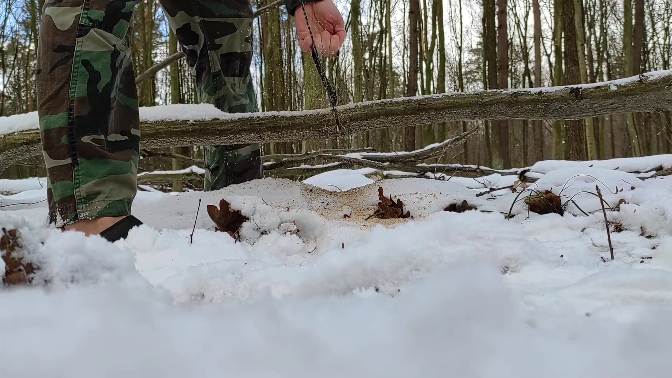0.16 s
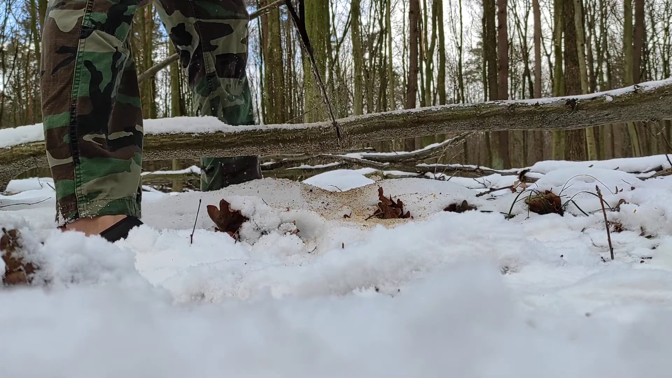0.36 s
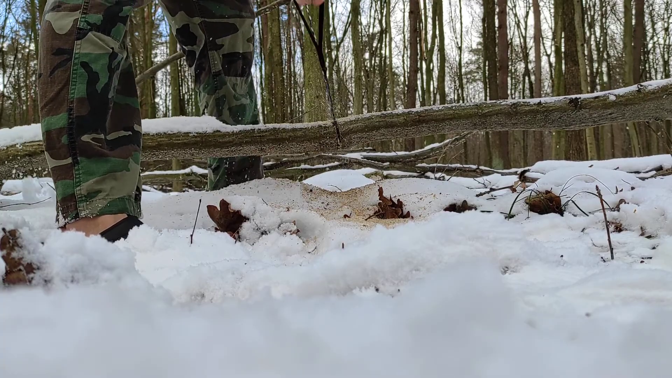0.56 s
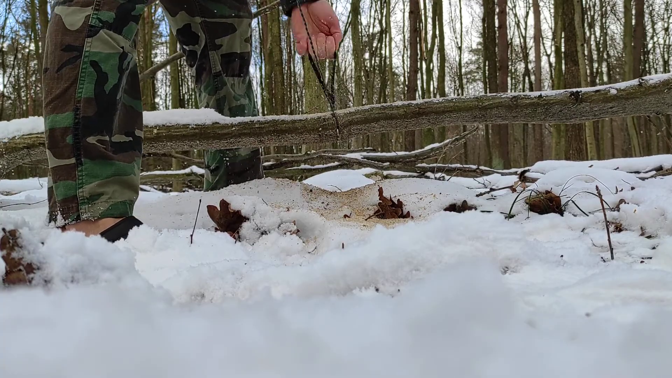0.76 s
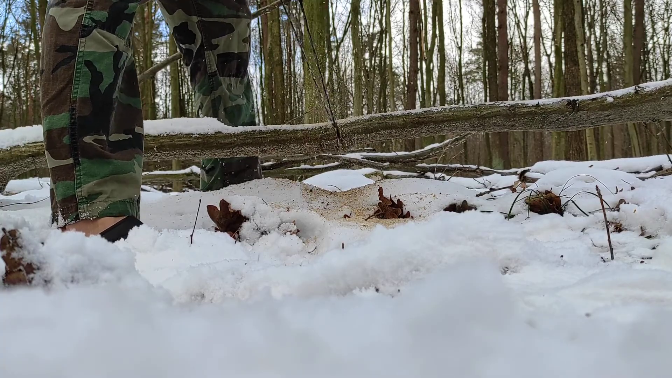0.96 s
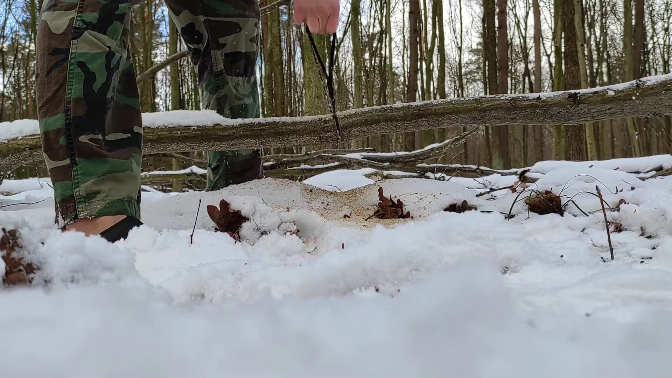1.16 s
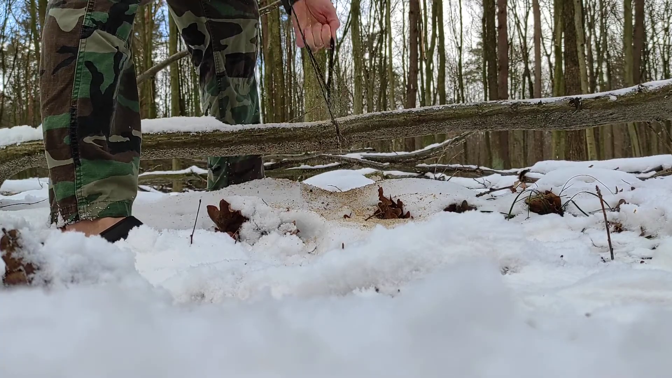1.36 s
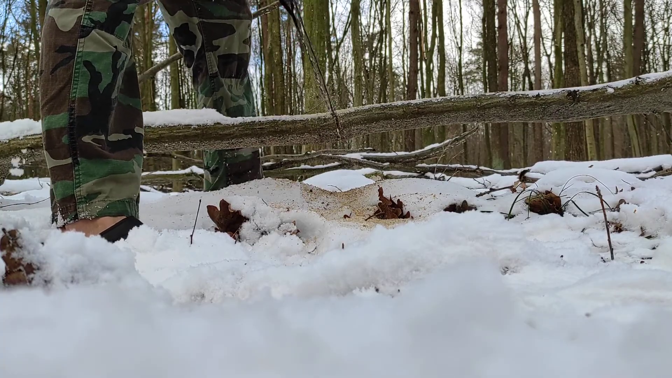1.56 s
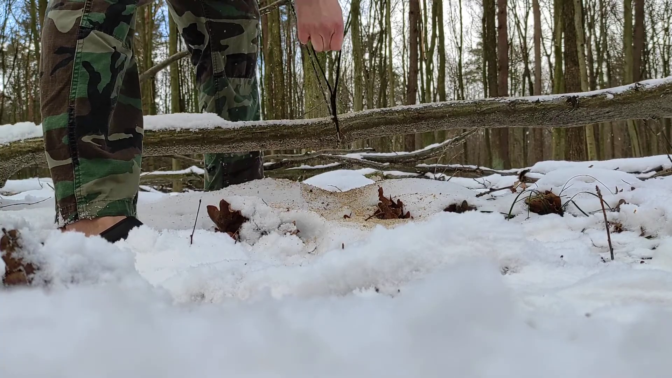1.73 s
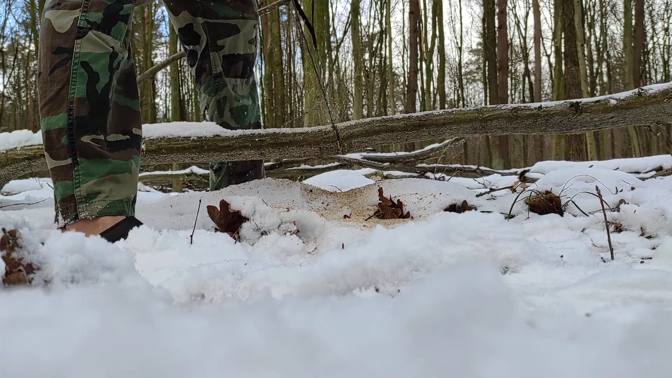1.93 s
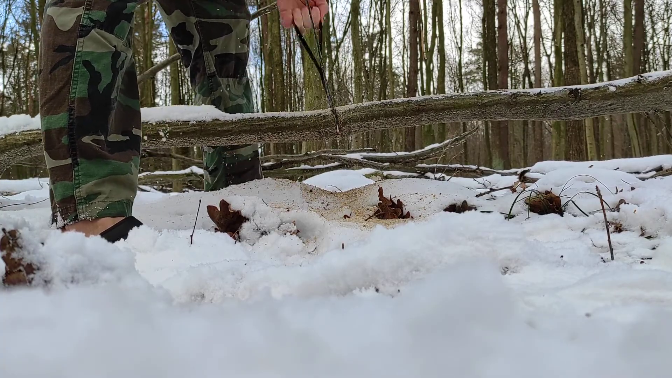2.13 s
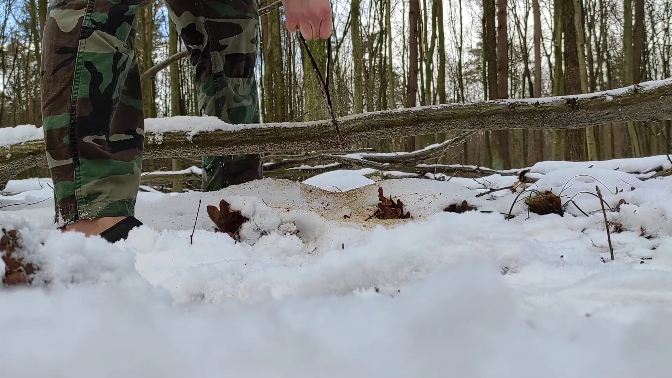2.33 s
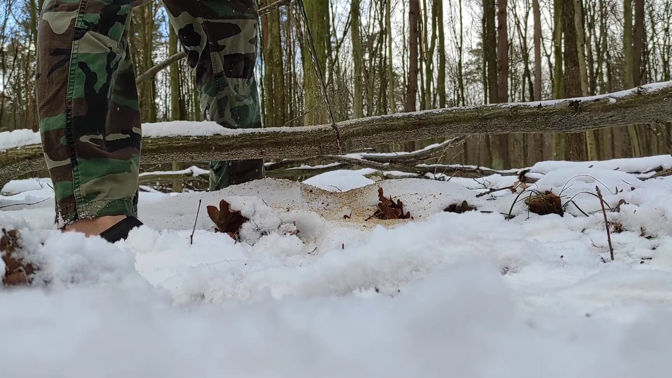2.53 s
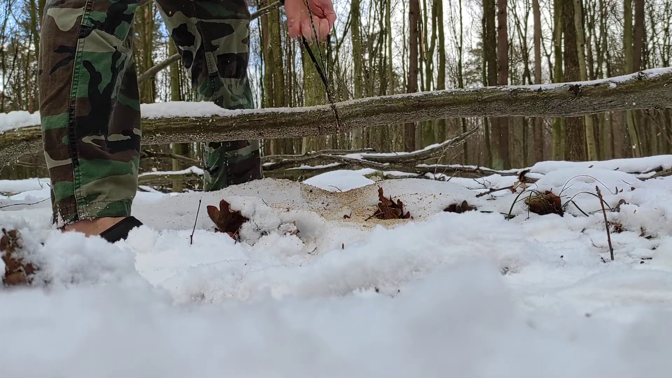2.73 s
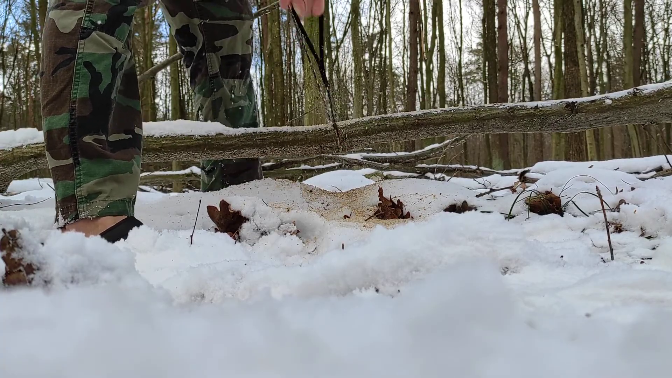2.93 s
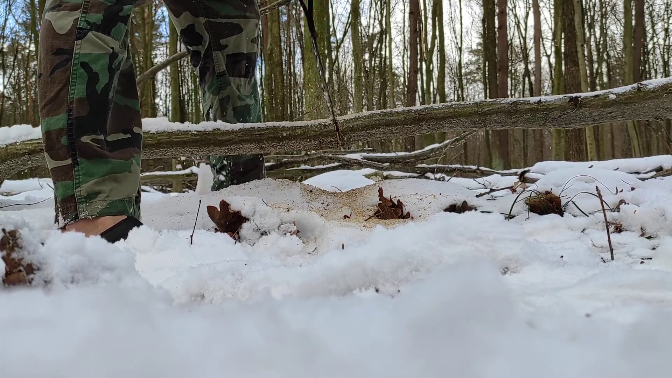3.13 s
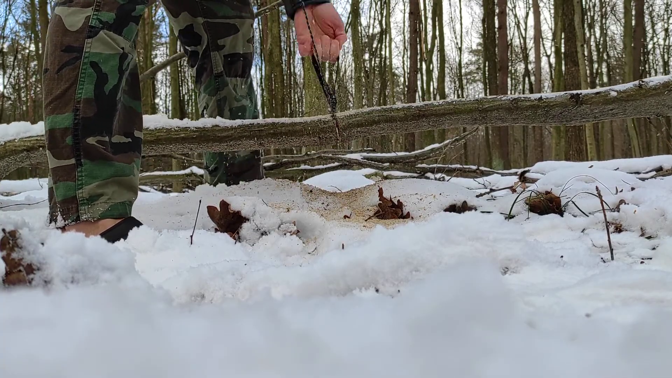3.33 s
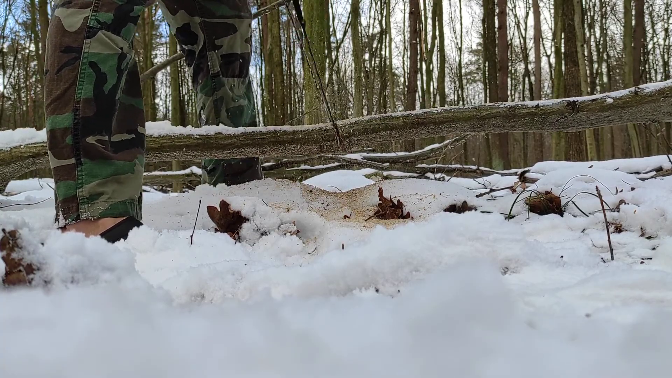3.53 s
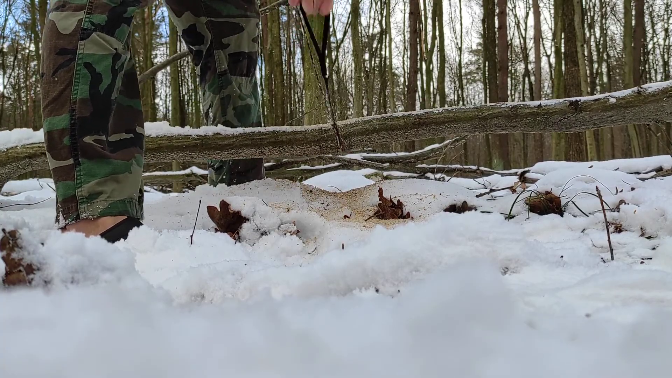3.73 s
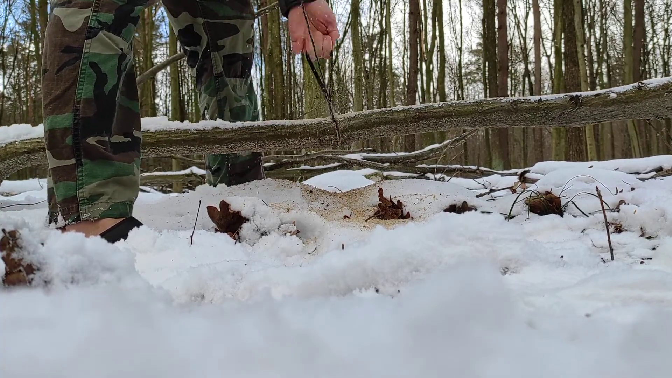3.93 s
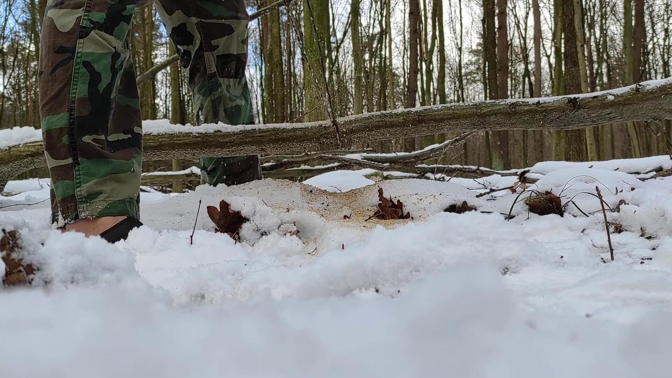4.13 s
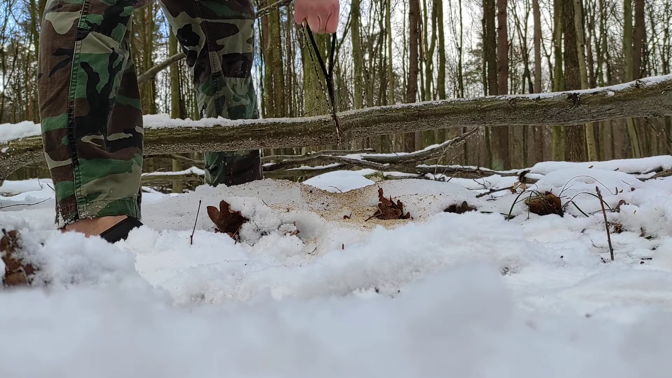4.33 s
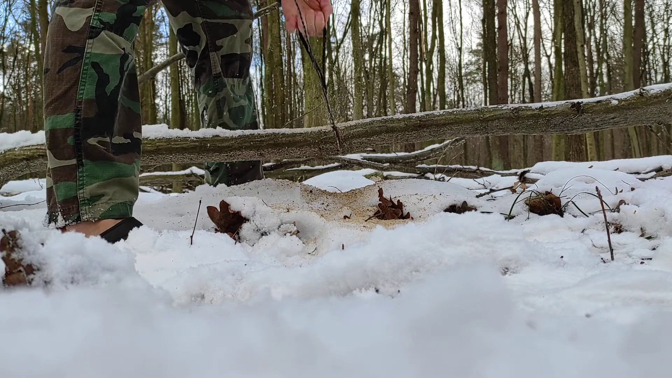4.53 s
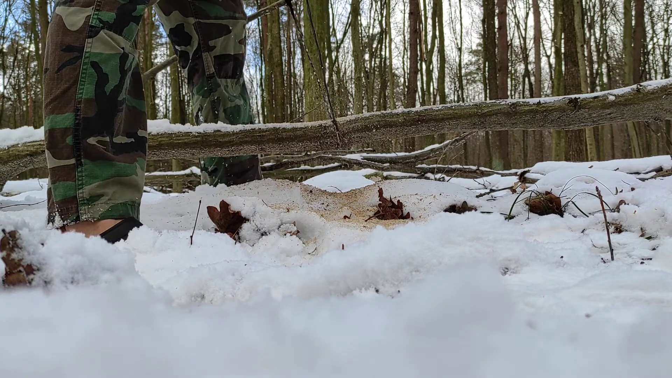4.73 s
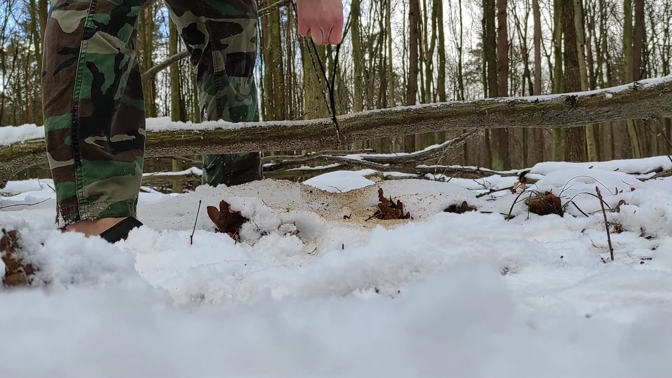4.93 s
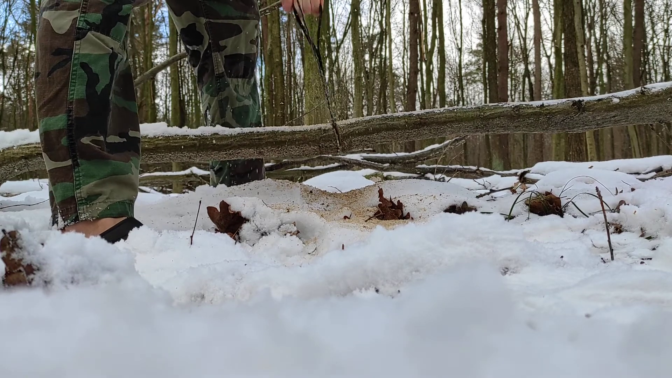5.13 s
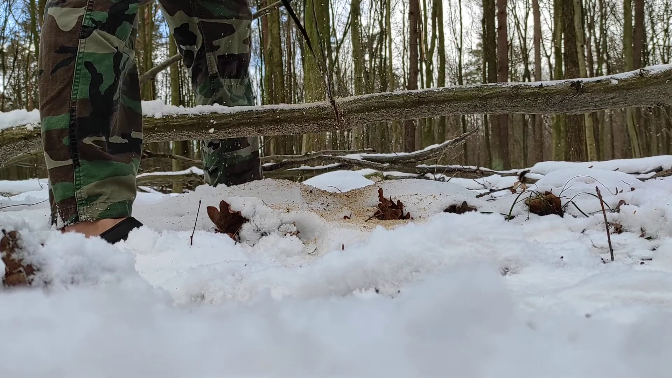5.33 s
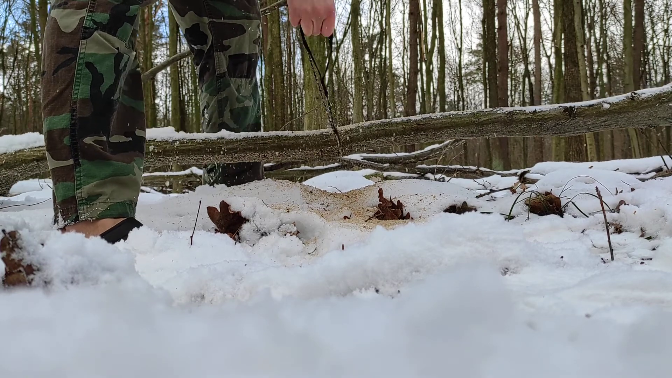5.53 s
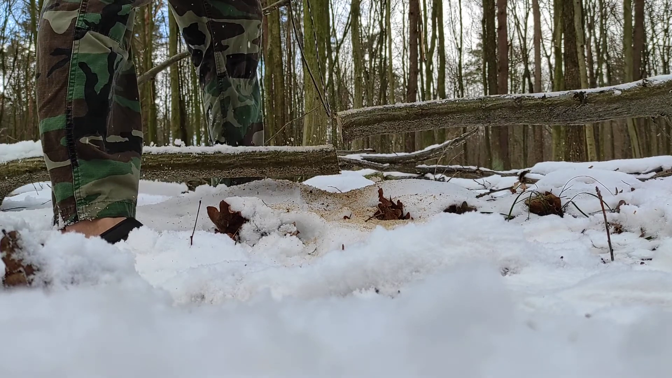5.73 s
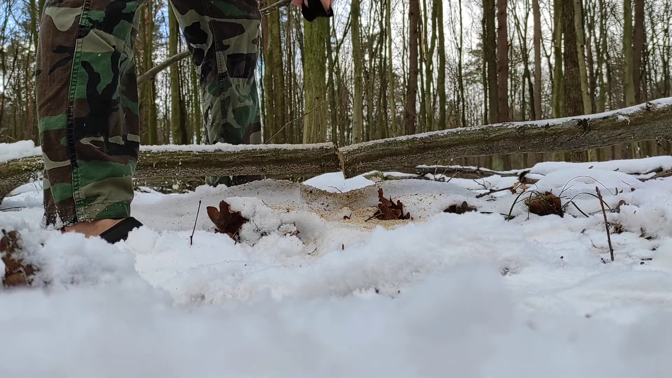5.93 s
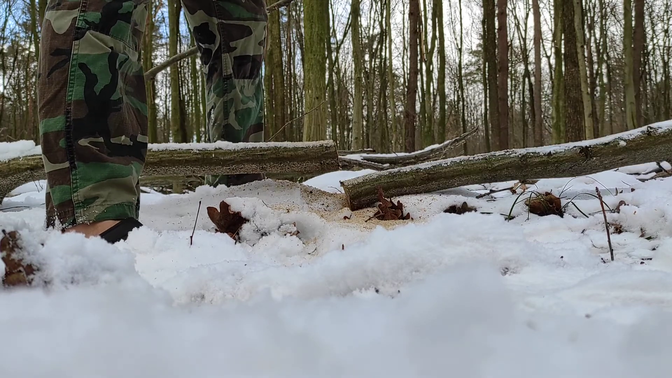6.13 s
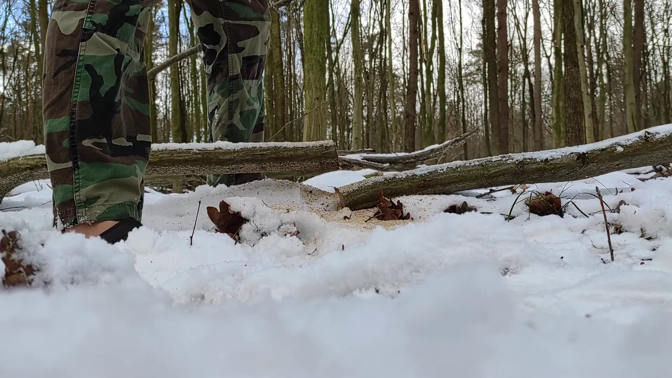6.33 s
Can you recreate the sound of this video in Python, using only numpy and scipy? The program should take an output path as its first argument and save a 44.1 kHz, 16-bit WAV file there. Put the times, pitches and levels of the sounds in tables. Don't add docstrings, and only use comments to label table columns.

```python
import sys
import numpy as np
from scipy import signal
from scipy.fft import rfft, irfft, next_fast_len
from scipy.io import wavfile
from scipy.ndimage import uniform_filter1d, map_coordinates

SR = 44100
rng = np.random.default_rng(int(sys.argv[2]) if len(sys.argv) > 2 else 0)


def output_pcm(signal):
    pcm = np.clip(np.atleast_2d(signal).T, -1, 1) * 32767
    wavfile.write(sys.argv[1], SR, np.round(pcm).astype(np.int16))


def ratio_of_db(decibels):
    return 10 ** (np.asarray(decibels, float) / 20)


N = 285325

THROUGH_S, LAND_S = 5.628, 6.15
RING_LAG_S, SWAY_LAG_S = 0.012, 0.064
BITE_SCATTER_DB, GRIP_DB, UNEVEN_DB = 1.9, 0.8, 1.2
CHATTER_DB = 3.0
# time_s, share_0_1
CUT_DEPTH = [(0, 0.02), (3.4, 0.25), (4.4, 0.52), (6.47, 0.66)]
# pitch_hz, width_hz, level_db
SOUND_LOG_MODES = [(184, 55, -17.5), (296, 21, 3.5), (471, 31.3, -3.5), (600, 76, -6.5), (866, 26, -8.5),
                   (1095, 37, -12), (1350, 91, -19.5)]
# pitch_hz, width_hz, level_db
CUT_LOG_MODES = [(204, 156, -15.5), (310, 78, 2), (421, 94, 6), (526.6, 71, 0.5), (900, 113, -4),
                 (1080, 88, -2.5)]
# pitch_hz, width_hz, level_db
CHATTER_MODE = [(296, 40, 0)]
# freq_hz, level_db
SWAY_HUM = [(70, -40.5), (110, -16), (140, -0.5), (220, 0.5), (400, -8), (700, -17), (1500, -37)]


def saw():
    t = np.arange(N) / SR
    depth_s, depth_share = np.transpose(CUT_DEPTH)
    cut = np.clip(np.interp(t, depth_s, depth_share), 0, 1)

    def until_through(db, lag_s):
        return ratio_of_db(db - 520 * np.clip(t - THROUGH_S - lag_s, 0, 1))

    rasp_db = pulls(PULL_RASP, turn_db=27, lag_s=0) - 2.0 + UNEVEN_DB * wobble(25)
    rasp_gain = until_through(rasp_db, 0) + jolts(JOLT_RUSTLE, below_db=-3.5)
    scrape_db = pulls(PULL_RASP, turn_db=25, lag_s=-0.0028) - 4.0 - 7 * cut
    scrape_gain = until_through(scrape_db, 0) + jolts(JOLT_RUSTLE, below_db=1.5)
    ring_db = pulls(PULL_RING, turn_db=20, lag_s=RING_LAG_S, peaked=0.79) + 1.5
    ring_gain = until_through(ring_db, RING_LAG_S) + jolts(JOLT_RING, below_db=-1)
    sway_db = pulls(PULL_RING, turn_db=9, lag_s=SWAY_LAG_S) - 14 + 17 * cut
    sway_db = np.where(t < THROUGH_S + SWAY_LAG_S, sway_db, -47)
    sway_db = sway_db - 110 * np.clip(t - LAND_S, 0, 1)

    grip = ratio_of_db(GRIP_DB * wobble(40) + 0.81 * wobble(160))
    teeth = bites(per_s=650, scatter_db=BITE_SCATTER_DB, bed=0.7) * grip
    blurred = teeth + 0.76 * rng.standard_normal((2, N))
    tearing = patchy(spread(blurred), depth_db=3.0)
    chatter_db = CHATTER_DB * even(filtered(tearing[:1], modes(CHATTER_MODE)), span_s=0.03)

    rasp = even(filtered(snow_echo(spread(teeth)), ports), span_s=0.047)
    rasp = rasp * rasp_gain * ratio_of_db(chatter_db)
    scrape = even(filtered(tearing, bark), span_s=0.05) * scrape_gain
    sound_ring = unit(filtered(tearing, modes(SOUND_LOG_MODES)))
    cut_ring = unit(filtered(tearing, modes(CUT_LOG_MODES)))
    wood = np.sqrt(1 - cut) * sound_ring + np.sqrt(cut) * cut_ring
    wood = filtered(wood, lambda hz: hz ** 2 / (hz + 60 - 60j) ** 2)
    sway = even(spread(noise(SWAY_HUM)), span_s=0.45) * ratio_of_db(sway_db)
    return rasp + scrape + sway + even(wood, span_s=0.034) * ring_gain


RISE, FALL = 2.6, 3.0
PULL_RASP, PULL_RING = 3, 4
# start_s, length_s, fastest_share_0_1, rasp_db, log_ring_db
STROKES = [(-.061, 0.3, 0.49, -28, -33), (0.274, 0.28, 0.45, -28.5, -32), (0.564, 0.3, 0.51, -29, -33.5),
           (0.892, 0.28, 0.5, -27.5, -31.5), (1.209, 0.29, 0.5, -29, -32.5),
           (1.534, 0.27, 0.53, -27, -30.5), (1.839, 0.28, 0.55, -29, -32), (2.173, 0.28, 0.43, -27.5, -31),
           (2.471, 0.29, 0.47, -28.5, -33), (2.801, 0.27, 0.55, -29, -33), (3.098, 0.29, 0.64, -29.5, -34),
           (3.441, 0.28, 0.44, -31.5, -34), (3.748, 0.28, .55, -27, -37.5), (4.047, 0.31, 0.58, -31, -36.5),
           (4.349, 0.32, .56, -30.5, -37), (4.671, 0.31, .6, -30.5, -35), (4.978, 0.32, .62, -29, -36.5),
           (5.308, .32, 0.55, -32, -38.5)]


def pulls(column, turn_db, lag_s, peaked=1):
    rows = np.transpose(STROKES)
    middle_s = rows[0] + rows[1] / 2
    strength_db = np.interp(np.arange(N) / SR - lag_s, middle_s, rows[column])
    return strength_db - turn_db * slack(lag_s) ** peaked


def slack(lag_s):
    t = np.arange(N) / SR - lag_s
    start, length, share = np.transpose(STROKES)[:3]
    fastest = start + np.clip(share, 0.1, 0.9) * length
    knots = np.ravel([start, fastest, start + length], "F")
    u = np.interp(t, knots, np.tile([-1, 0, 1], len(start)))
    resting = np.searchsorted(knots, t) % 3 == 0
    return np.where(resting, 1, np.abs(u) ** np.where(u < 0, RISE, FALL))


JOLT_RISE_S, STILL_DB = 0.0092, -75
JOLT_RUSTLE, JOLT_RING = 2, 3
# start_s, hold_s, rustle_db, log_ring_db, t60_s
JOLTS = [
    (5.657, 0.022, -52.5, -49.5, 0.36),
    (5.703, 0.013, -54, -52, .2),
    (5.739, 0.026, -45.5, -45.5, 0.037),
    (5.794, 0.026, -53, -37.5, 0.034),
    (5.836, 0.1, -58, -70, .2),
    (5.94, 0.0085, -49, -46.5, 0.48),
    (6.073, .015, -59, -70, .1),
    (6.116, 0.013, -54, -50, 0.15),
]


def jolts(column, below_db):
    rows = np.array(JOLTS)[:, :, None]
    t = np.arange(N) / SR - rows[:, 0]
    decay_db = -60 * np.clip(t - rows[:, 1], 0, 9) / rows[:, 4]
    shape_db = np.where(t < 0, 9 * t / JOLT_RISE_S, decay_db)
    power = np.sum(ratio_of_db(2 * (rows[:, column] + shape_db)), 0) + ratio_of_db(2 * STILL_DB)
    return np.sqrt(power) * ratio_of_db(-below_db)


def bites(per_s, scatter_db, bed):
    draw = rng.random((2, N))
    train = (draw[0] < per_s / SR) * ratio_of_db(-scatter_db * np.log(draw[1] + 0.08))
    return unit(unit(bursts(train, life_s=0.00017)) + bed * rng.standard_normal((2, N)))


def bursts(train, life_s):
    u = np.arange(SR // 50) / SR / life_s
    return signal.fftconvolve(train, u * np.exp(-u))[:N] * rng.standard_normal((2, N))


def patchy(x, depth_db):
    z = signal.stft(x, nperseg=1024)[2]
    field = uniform_filter1d(rng.standard_normal(z.shape[1:]), size=5, axis=0)
    field = uniform_filter1d(field, size=3, axis=1)
    return signal.istft(z * ratio_of_db(depth_db * unit(field)), nperseg=1024)[1][:, :N]


# freq_hz, level_db
SCRAPE_COLOUR = [(600, -67.5), (1100, 8), (1700, 3), (3000, -2), (5000, -7), (6500, -3), (9000, -32)]
# pitch_hz, width_hz, level_db
BARK_MODES = [(2189, 120, 0), (2795, 160, -1), (3381, 120, -2), (3764, 110, 0), (4349, 120, -1),
              (4765, 130, -1)]


def bark(hz):
    return causal(SCRAPE_COLOUR)(hz) * (1 + modes(BARK_MODES, order=1)(hz))


# time_s, peak_db, left_over_right_db, scrape_over_peak_db
BREAK = [(5.6745, -39, -24, -20), (5.7074, -40, -9, -26), (5.7363, -36, -2.5, -14.5),
         (5.7482, -21.5, 0, -41), (5.7521, -31, -2, -0.5), (5.7552, -42, -3.0, 3), (5.776, -37, -3.0, -15),
         (5.7884, -40, -8.0, -17), (5.7966, -35, -19, -4.5), (5.8128, -28, -14, -15),
         (5.8204, -41, -4.0, -23), (5.9394, -40.5, -12, -1), (5.983, -39, -7.5, -4.5),
         (5.9938, -38, -19, -18), (6.03, -42, 4, -12), (6.105, -16, 1, -27), (6.1596, -55.5, -6, 7),
         (6.2063, -60, 1, -27), (6.2237, -36, 8, -10.5), (6.3066, -45, 6, -26), (6.3407, -33, -8, -60),
         (6.4126, -34.5, -1, -20.5)]


def snaps():
    rows = [(s, db, -2.4, scrape_db) for s, db, scrape_db in fibres()] + BREAK
    s, db, pan_db, scrape_db = np.transpose(rows)
    at = np.round((s + 0.0009) * SR).astype(int)
    tick, knock = np.zeros((2, N))
    tick[at] = ratio_of_db(1.15 * db + 27)
    knock[at] = ratio_of_db(db + scrape_db + 28.5)
    pan_curve_db = np.interp(np.arange(N), np.sort(at), pan_db[np.argsort(at)] + 3.0)
    side = ratio_of_db(np.outer([0.5, -0.5], pan_curve_db))
    pair = np.array([[1], [0.3]])
    fray = bursts(tick, life_s=0.0006) * ratio_of_db(-25)
    bright = filtered(spread(tick * pair + fray) * side, ports)
    blow = spread(0.42 * knock * pair + 0.15 * bursts(knock, life_s=0.001))
    body = filtered(blow, lambda hz: bark(hz) + 0.5 * modes(CUT_LOG_MODES)(hz))
    return snow_echo(bright + body)


STRAYS, STRAY_DB, STRAY_SCRAPE_DB = 1, 4.5, -18
ODD_DB, FADE_DB, RUN_SCRAPE_DB = 3.5, 1.1, -19
# time_s, peak_db, scrape_over_peak_db
SNAPS = [(0.0558, -17, -18), (0.1062, -16, -19), (0.3885, -15, -20), (1.0156, -14, -22), (1.0585, -15, -16),
         (1.071, -9, -22), (1.3309, -16, -18), (1.4691, -22, -21), (1.6561, -12, -21), (2.2333, -17, -18),
         (2.2618, -14, -21), (2.2997, -14, -22), (2.3745, -11, -28), (2.4134, -21, -22), (2.6514, -16, -22),
         (2.8724, -16, -22), (2.9492, -13, -23), (2.9662, -12, -25), (2.9756, -8, -29), (3.9315, -17, -21),
         (4.0013, -15, -34), (4.5436, -14, -25), (4.7576, -16, -26), (4.789, -17, -24), (4.8973, -18, -27),
         (5.2814, -17, -27), (5.4071, -16, -28), (5.4385, -18, -24), (5.5528, -14, -32)]
# time_s, peak_db, scrape_over_peak_db
CATCHES = [(0.3027, -28, -16), (0.3074, -26, -14), (0.607, -29, -16), (0.624, -26, -13), (0.9058, -30, -13),
           (1.2336, -30, -13), (1.2595, -22, -15), (1.5703, -28, -10), (1.8672, -30, -21),
           (1.8856, -25, -16), (2.2049, -20, -18), (2.4922, -33, -14), (2.5092, -22, -20),
           (2.817, -27, -20), (2.8365, -26, -17), (3.1527, -26, -13), (3.4755, -26, -19), (3.492, -24, -17),
           (3.7823, -27, -17), (4.0981, -23, -20), (4.4099, -27, -16), (4.6992, -25, -24),
           (4.7232, -18, -25), (5.015, -28, -20), (5.0434, -25, -23), (5.3398, -28, -23)]
# first_s, gap_s, cutters, peak_db
RUNS = [
    (3.5428, .0256, 5, -10),
    (4.1649, .0259, 5, -11.5),
    (5.1627, .0267, 3, -14),
    (3.1862, .0309, 2, -21),
    (3.8646, .042, 2, -18),
    (3.3278, .035, 2, -24),
    (4.3051, .1, 1, -24),
]


def fibres():
    runs = []
    for s, gap_s, cutters, db in RUNS:
        for k in range(cutters):
            runs.append((s + k * gap_s, db - ODD_DB * (k % 2) - FADE_DB * k, RUN_SCRAPE_DB))
    when, size = rng.random((2, len(STROKES), STRAYS))
    start_s = np.array(STROKES)[:, :1]
    stray_s = np.clip(start_s + 0.05 + 0.2 * when, 0, THROUGH_S).ravel()
    pull_db = pulls(PULL_RASP, turn_db=37, lag_s=0)[(stray_s * SR).astype(int)]
    stray_db = pull_db + STRAY_DB + 4 * size.ravel()
    return SNAPS + CATCHES + runs + [(s, db, STRAY_SCRAPE_DB) for s, db in zip(stray_s, stray_db)]


# time_s, peak_db, pitch_hz, t60_s
THUDS = [
    (5.755, -45, 393, 0.035),
    (5.793, -38, 260, 0.029),
    (5.812, -34, 206, 0.043),
    (5.943, -54, 334, 0.04),
    (6.042, -61, 332, 0.045),
    (6.124, -38, 382, 0.049),
    (6.15, -33.5, 460, 0.024),
    (6.162, -32.5, 296, 0.025),
    (6.198, -43, 155, 0.059),
    (6.223, -50, 74.6, 0.15),
]


def thuds():
    out, t = np.zeros(N + SR), np.arange(SR // 4) / SR
    for s, db, hz, t60_s in THUDS:
        shape = ratio_of_db(db + 8.0) * (1 - np.exp(-t / 0.00036))
        ring = ratio_of_db(-60 * t / t60_s) * np.sin(2 * np.pi * hz * t)
        push = 0.15 * ratio_of_db(-60 * t / 0.18) * np.sin(2 * np.pi * 72 * t)
        out[round(s * SR):][:len(t)] += shape * (ring + push)
    return out[:N] * ratio_of_db([[1.8], [-1.8]])


# delay_s, left_db, right_db
ECHOES = [(.0014, -8, -9), (.0031, -14, -15), (.0066, -18, -17)]


def snow_echo(x):
    def response(hz):
        return 1 + sum(ratio_of_db([[left_db], [right_db]]) * np.exp(-2j * np.pi * hz * s)
                       for s, left_db, right_db in ECHOES)
    return filtered(x, response)


# freq_hz, level_db
RUMBLE = [(15, -3), (40, -1), (70, 2.5), (110, 2.5), (200, -2), (400, -20.5), (800, -23)]
# freq_hz, level_db
AIR = [(180, -95), (300, -45), (385, 15), (603, -19), (2250, -24), (2980, -29), (5600, -9), (7500, 1),
       (9500, -33), (14200, -14), (16000, -32)]


def forest():
    swell_db = 1.3 * wobble(4)
    settle_db = np.clip(40 * (np.arange(N) / SR - LAND_S), 0, 5)
    rumble = unit(spread(noise(RUMBLE))) * ratio_of_db(-57 + swell_db - settle_db)
    return rumble + unit(noise(AIR)) * ratio_of_db(-63.5 + swell_db)


# freq_hz, level_db
LEFT_PORT = [(4000, -56.5), (5500, -10.5), (6500, -40.5), (7200, -5), (7800, 0), (8400, -2.5),
             (8900, -12.5), (9500, -25), (11000, -23.5), (13000, -23.5), (15700, -47)]
# freq_hz, level_db
RIGHT_PORT = [(4000, -80), (5300, -13), (6400, -7), (7200, -0.5), (7800, 3.5), (8400, -16.5), (8900, -18),
              (9500, -19), (11000, -26.5), (13000, -25.5), (15700, -30.5)]


def ports(hz):
    right_over_left_db = along(RIGHT_PORT, hz) - along(LEFT_PORT, hz)
    return causal(LEFT_PORT)(hz) * ratio_of_db([0 * hz, right_over_left_db])


# freq_hz, likeness_0_1
ALIKE = [(60, .75), (150, .88), (330, .55), (800, .35), (2000, .5), (5500, .35), (7500, .78), (9000, .4),
         (13000, .5)]
# freq_hz, right_ahead_rad
LEAD = [(350, 0), (600, 1.2), (1200, 2.8), (3000, 2.2), (4000, .4), (6000, 1.2), (7400, .3), (9200, .7),
        (9700, 3.0), (16000, 3.1)]
# freq_hz, left_over_right_db
LEAN = [(60, 3.6), (450, 3.2), (770, -1.5), (1170, 3), (2000, 0), (5000, -1)]


def spread(pair):
    m = 2 * next_fast_len(N // 2 + 4096)
    hz = np.fft.rfftfreq(m, 1 / SR)
    turn = np.arccos(np.clip(along(ALIKE, hz), 0, 1)) / 2
    shared, own = rfft(pair, m) * [np.cos(turn), np.sin(turn)]
    tilt = ratio_of_db(along(LEAN, hz) / 2) * np.exp(-0.5j * along(LEAD, hz))
    return irfft([(shared + own) * tilt, (shared - own) / tilt], m)[:, :N]


# freq_hz, bar_over_local_rms
THIN = [(1100, 0), (2200, .9), (5000, .9), (6300, .1), (8700, .1), (9600, 1.05)]


def thinned(x):
    hz, _, z = signal.stft([x[0] + x[1], x[0] - x[1]], SR, nperseg=2048)
    local_rms = np.sqrt(uniform_filter1d(np.abs(z) ** 2, size=16, axis=1))
    flicker = ratio_of_db(4.5 * unit(uniform_filter1d(rng.standard_normal(z.shape), size=12, axis=1)))
    strong = np.abs(z) >= along(THIN, hz)[:, None] * local_rms * flicker
    mid, side = signal.istft(z * strong, nperseg=2048)[1][:, :N]
    return np.array([mid + side, mid - side]) / 2


def unit(x):
    return x / np.sqrt(np.mean(x ** 2) + 1e-20)


def even(x, span_s):
    power = uniform_filter1d(np.mean(x ** 2, 0), int(span_s * SR))
    return x / np.sqrt(np.abs(power) + 1e-12)


def wobble(rate_hz):
    knots = rng.standard_normal(int(N * rate_hz / SR) + 4)
    return map_coordinates(knots, [np.arange(N) * rate_hz / SR])


def noise(points):
    return filtered(rng.standard_normal((2, N)), lambda hz: ratio_of_db(along(points, hz)))


def along(points, hz):
    f, v = np.transpose(points)
    return np.interp(np.log(hz + 1), np.log(f + 1), v)


def filtered(x, response):
    m = 2 * next_fast_len(N // 2 + 4096)
    return irfft(rfft(x, m) * response(np.fft.rfftfreq(m, 1 / SR)), m)[..., :N]


def causal(points):
    def response(hz):
        cepstrum = irfft(np.log(ratio_of_db(along(points, hz))))
        cepstrum[1:len(hz) - 1] *= 2
        cepstrum[len(hz):] = 0
        return np.exp(rfft(cepstrum))
    return response


def modes(table, order=-1):
    def response(f):
        return sum(order ** k * ratio_of_db(db) * 1j * f * width / (hz * hz - f * f + 1j * f * width)
                   for k, (hz, width, db) in enumerate(table))
    return response


def scene():
    return thinned(saw() + forest()) + snaps() + thuds()


def low_pass(x):
    return signal.sosfilt(signal.butter(12, 16580, fs=SR, output="sos"), x)


def record(dry):
    mix = filtered(dry, lambda hz: hz < 15800)
    return low_pass(mix)


dry = scene()
out = record(dry)
output_pcm(out)
```